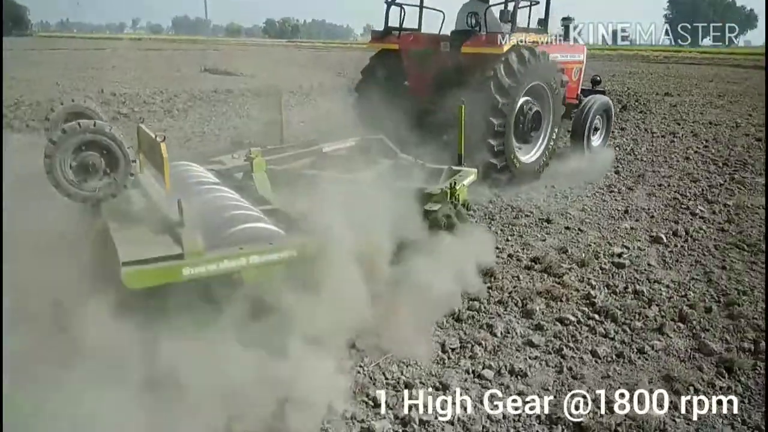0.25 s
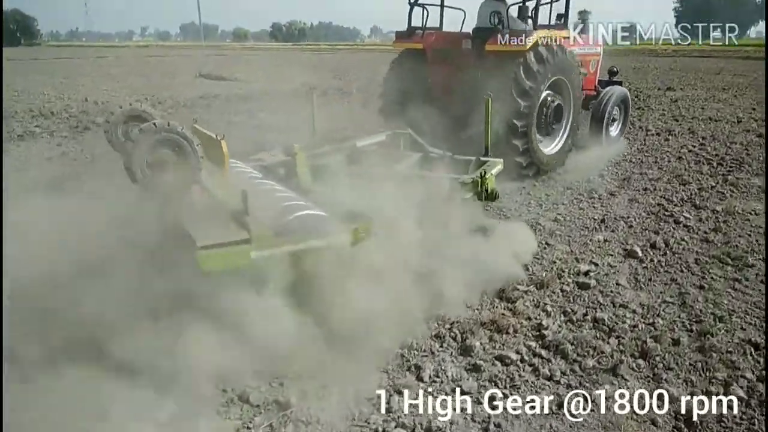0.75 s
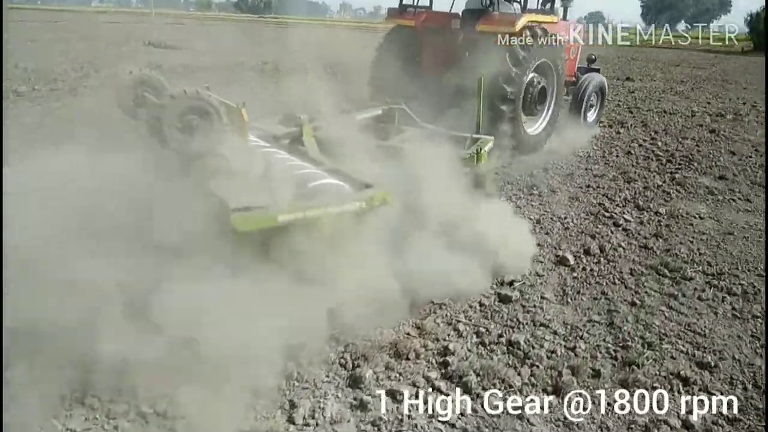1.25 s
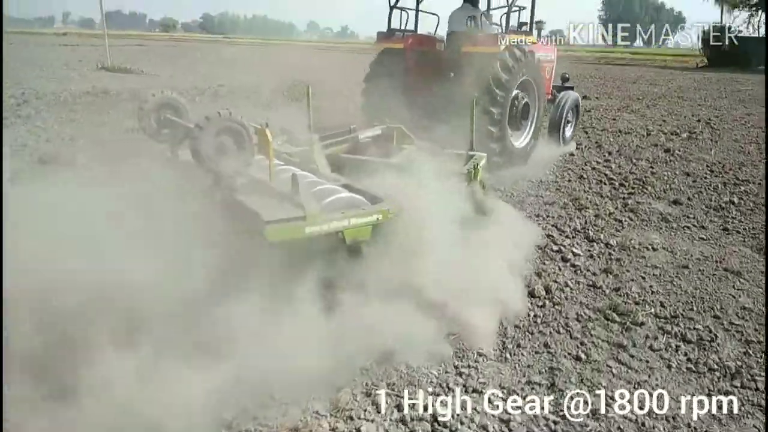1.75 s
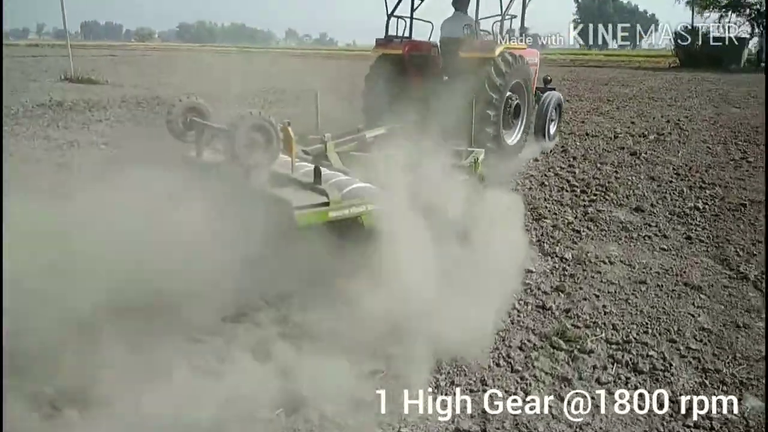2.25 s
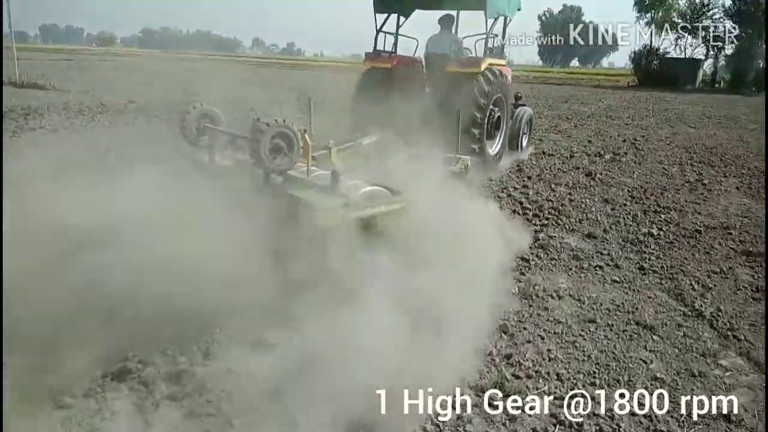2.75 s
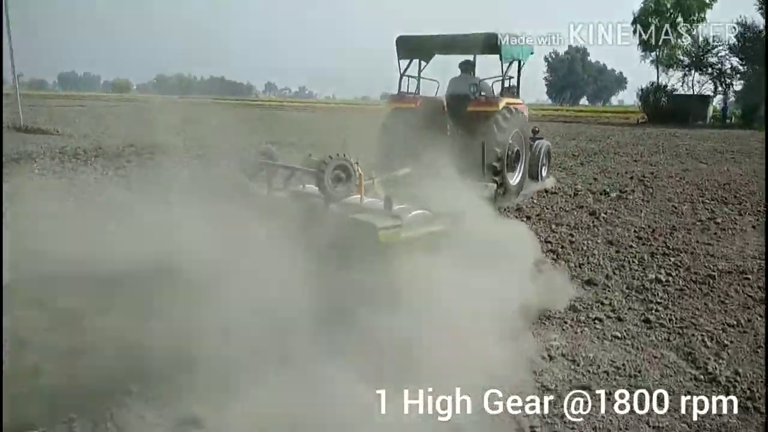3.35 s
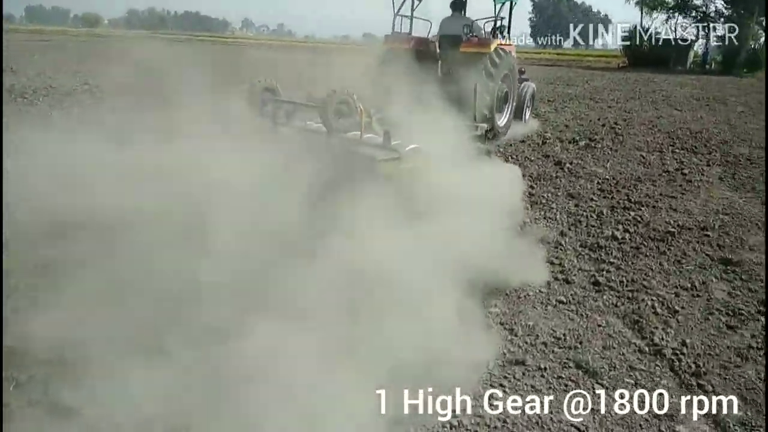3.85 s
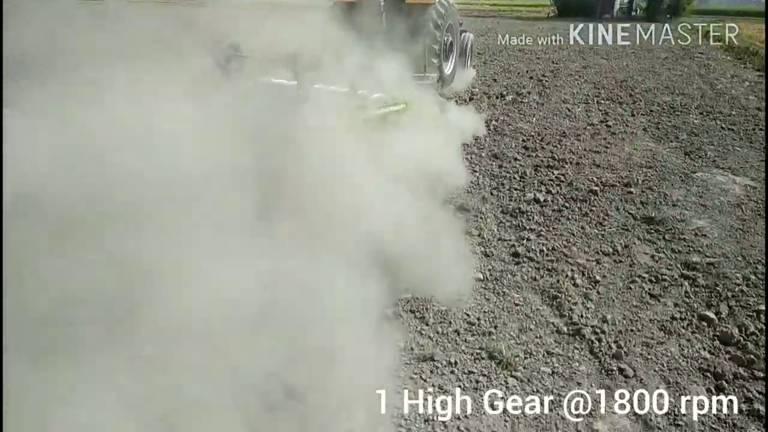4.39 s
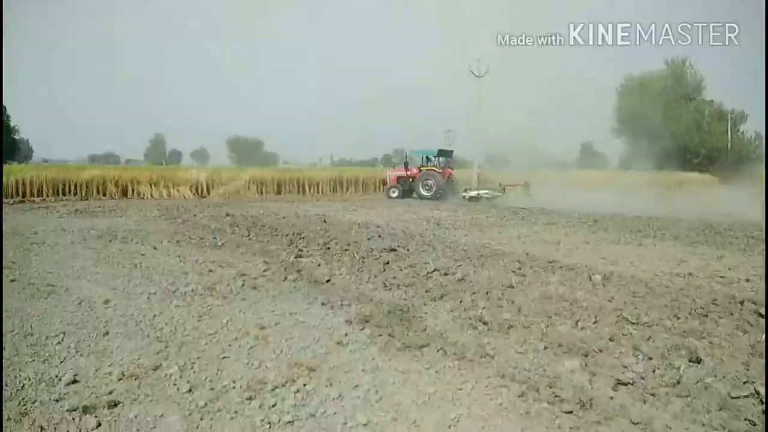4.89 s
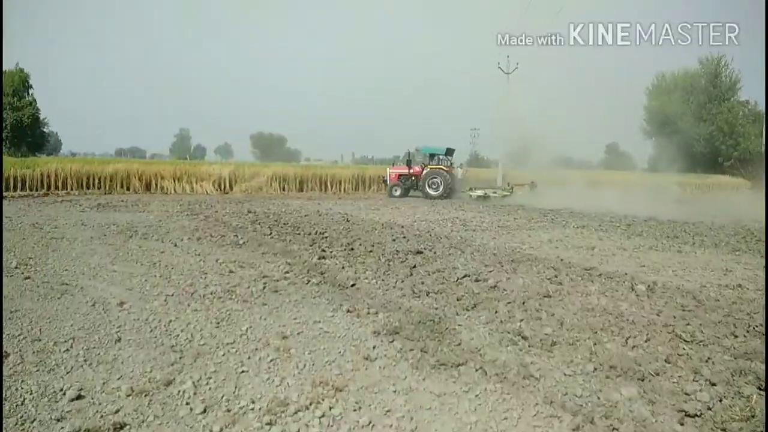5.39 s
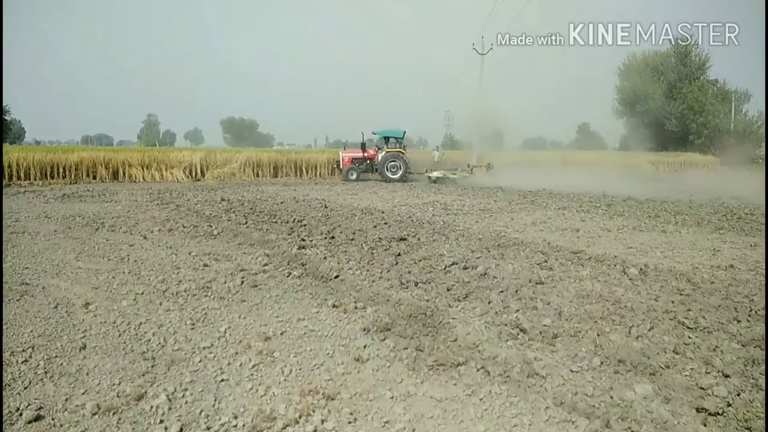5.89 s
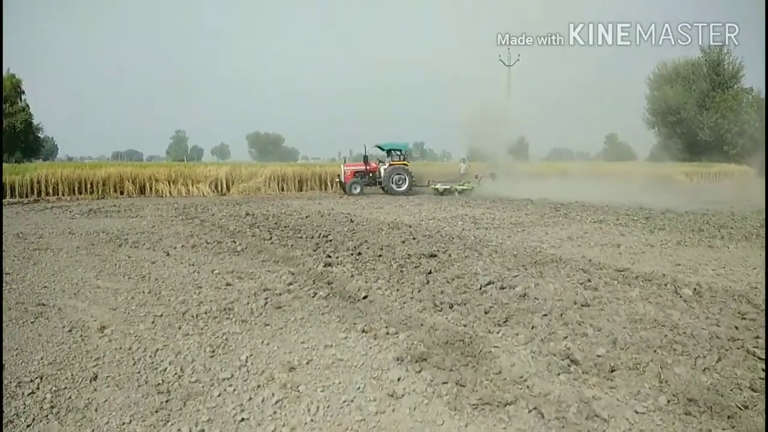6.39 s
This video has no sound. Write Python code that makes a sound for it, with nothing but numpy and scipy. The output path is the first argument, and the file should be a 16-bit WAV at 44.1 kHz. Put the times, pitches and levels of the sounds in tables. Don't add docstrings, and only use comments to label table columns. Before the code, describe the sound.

Outdoors in an open field, a four-cylinder diesel tractor drones under load close to a handheld phone, with engine clatter, wavering gear whine and a harrow rasping and hissing over dry soil. Stones tick sharply on the discs. It slowly recedes, then after a tiny hush the sound jumps to a distant view: thinner drone, slightly faster engine, fainter rasp and ticks.

```python
import sys
import numpy as np
from scipy import signal
from scipy.fft import rfft, irfft, next_fast_len
from scipy.io import wavfile
from scipy.ndimage import uniform_filter1d, map_coordinates

SR = 44100
rng = np.random.default_rng(int(sys.argv[2]) if len(sys.argv) > 2 else 0)


def natural_amplitude(level_db):
    exponent = np.asarray(level_db, float) / 20
    return 10 ** exponent


def wav_record(signal):
    frames = np.transpose(np.atleast_2d(signal))
    bounded = np.clip(frames, -1, 1)
    quanta = np.round(bounded * 32767).astype(np.int16)
    wavfile.write(sys.argv[1], SR, quanta)


N = 292383
T = np.arange(N) / SR
CHANGE_S = 4.746


def unit(x):
    return x / np.sqrt(np.mean(x ** 2) + 1e-20)


def along(points, hz):
    f, v = np.transpose(points)
    return np.interp(np.log(hz + 1), np.log(f + 1), v)


def curves(rows):
    s, *cols = np.transpose(rows)
    return [np.interp(T, s, c) for c in cols]


def swells(rows):
    return sum(db * np.exp(-((T - s) / length) ** 2) for s, length, db in rows)


def wobble(rate):
    knots = rng.standard_normal(N // 200)
    return map_coordinates(knots, [T * rate])


def filtered(x, response):
    m = next_fast_len(N + 8192)
    return irfft(rfft(x, m) * response(np.fft.rfftfreq(m, 1 / SR)), m)[..., :N]


def tone(cycles, flutter_db, drift, rate):
    phase = 2 * np.pi * (cycles + rng.random() + drift * wobble(rate))
    return np.sqrt(2) * natural_amplitude(flutter_db * wobble(rate)) * np.sin(phase)


# [f/Hz, likeness 0-1]
LIKENESS = [
    [(60, 0.41), (130, 0.86), (290, 0.93), (640, 0.98), (1410, 0.73), (2300, 0.31), (2800, .1),
     (15000, 0.081)],
    [(60, 0.75), (130, 0.98), (290, 0.58), (640, 0.99), (1030, .72), (1410, 0.77), (1720, 0.9),
     (2070, 0.94), (2750, .15), (3400, 0.27), (15000, 0.085)],
]


def rush(spectrum, side, patchy_db, streaky_db=0):
    z = signal.stft(rng.standard_normal((2, N)), nperseg=512)[2]
    patch = uniform_filter1d(rng.standard_normal(z.shape[1:]), size=6, axis=0)
    patch = uniform_filter1d(patch, size=10, axis=1)
    streak = uniform_filter1d(rng.standard_normal(z.shape), size=2, axis=1)
    streak = uniform_filter1d(streak, size=8, axis=2)
    gain_db = patchy_db * unit(patch) + streaky_db * unit(streak)
    pair = signal.istft(z * natural_amplitude(gain_db), nperseg=512)[1][:, :N]

    def spread(hz):
        colour = natural_amplitude(along(spectrum, hz)) * np.clip(hz / spectrum[0][0], 0, 1) ** 6
        angle = np.arccos(np.clip(along(LIKENESS[side], hz), 0, 1)) / 2
        return colour * [np.cos(angle), np.sin(angle)]

    mid, diff = filtered(pair, spread)
    return unit(np.array([mid + diff, mid - diff]))


# [start level/dB, loss/dB per s]
STEADY_LAYERS = [
    [(-29, 0.83), (-41.5, 1), (-40, 3), (-40, 3), (-28.5, 0.52)],
    [(-59.5, 0), (-51, 1.5), (-59, 0), (-53, 5.5), (-40, -1)],
]


def steady(side):
    start_db, loss_db = np.transpose(STEADY_LAYERS[side])
    return start_db[:, None] - loss_db[:, None] * (T - side * CHANGE_S)


# [t/s, third order level/dB]
STACK_FACING = [
    [(0.0, -48), (0.09, -24.5), (.35, -23.5), (.65, -29), (1.05, -25), (1.4, -31.5), (1.91, -29.5),
     (2.05, -26), (2.19, -34), (2.45, -33.5), (2.6, -35.5), (3.5, -40), (4.12, -51), (4.21, -47),
     (4.63, -35.5), (4.74, -51)],
    [(4.79, -42), (4.856, -37), (5.25, -45.5), (5.45, -43), (5.55, -46), (5.7, -48), (5.758, -48),
     (5.82, -37), (5.95, -45), (6.086, -41.5), (6.25, -35.5), (6.55, -38), (6.63, -38)],
]
# [multiple of firing, level/dB to the third order]
EXHAUST_ORDERS = [
    [(1.16, -24), (3, 1.5), (3.5, -15), (4, -13), (4.5, -19), (5, -16)],
    [(1.21, -33), (2.5, -27), (3, -1), (3.5, -24), (4, -26), (5, -37)],
]
# [f/Hz, level/dB per Hz]
PIPE_COLOUR = [
    [(76, -51), (130, 0), (226, 4.5), (345, -4), (439, -13), (500, -11.5), (560, -5.5), (650, -8.5),
     (1100, -120)],
    [(150, -32), (200, 5), (240, -10), (300, -11), (380, -10), (460, -5), (520, -24), (700, -120)],
]
# [f/Hz, level/dB per Hz]
GROUND_COLOUR = [
    [(13, -57), (22, -29), (59, -22.5), (99, -18.5), (150, -10.5), (200, -20), (330, -120)],
    [(13, -64), (22, -38), (65, -19), (113, -22), (150, 1), (200, -17), (330, -120)],
]
# [t/s, length/s, rise/dB]
ECHO_THROBS = [
    (.32, 0.097, -14),
    (.6, .1, 5),
    (.95, 0.054, -7),
    (1.12, .06, 4),
    (1.9, .1, -7),
    (3.2, .05, -6),
    (3.4, .06, 1),
    (3.7, 0.087, 9.5),
    (4.15, .12, 7.5),
    (4.6, 0.091, 3),
]
# [t/s, length/s, rise/dB]
RUMBLE_LUMPS = [(4.79, .03, 9), (4.96, 0.054, 8), (5.18, .025, 8), (5.42, .06, 4), (5.6, .05, -2),
                (5.84, .05, 6), (5.95, .04, -10), (6.08, 0.08, 16), (6.26, .03, -6), (6.43, 0.068, 7),
                (6.54, .04, 12)]


def exhaust(side, firings):
    order_db, = curves(STACK_FACING[side])
    rumble_db, ground_db, second_db = steady(side)[:3]
    flutter_db, rate = [(1.4, 11), (2.6, 19)][side]
    orders = sum(natural_amplitude(db) * tone(k * firings, flutter_db, drift=0.065, rate=rate)
                 for k, db in EXHAUST_ORDERS[side])
    second = tone(2 * firings, flutter_db=-1.5, drift=0.18, rate=8.1)
    puff = natural_amplitude(0.46 * np.cos(2 * np.pi * firings) + 0.58 * wobble(4.4))
    rumble = unit(puff * rush(PIPE_COLOUR[side], side, patchy_db=1.5, streaky_db=[0, 4.5][side]))
    ground = rush(GROUND_COLOUR[side], side, patchy_db=2.5)

    sound = natural_amplitude(order_db - 2.5) * orders
    sound = sound + natural_amplitude(second_db + swells(ECHO_THROBS)) * second
    sound = sound + natural_amplitude(rumble_db + side * swells(RUMBLE_LUMPS)) * rumble
    return sound + natural_amplitude(ground_db) * ground


# [clatter depth/dB, rasp and hiss depth/dB]
BEAT_DEPTH = [(.75, .3), (1.2, 1.5)]
# [t/s, engine block level/dB]
NEARNESS = [
    [(0.0, -33), (0.84, -32.5), (3.25, -34.5), (3.45, -33.5), (4.66, -36), (4.71, -34), (4.74, -37)],
    [(4.79, -32), (4.974, -33.5), (6.608, -32.5), (6.63, -31)],
]
# [f/Hz, level/dB per Hz]
BLOCK_COLOUR = [
    [(620, -16), (1050, -8.5), (1190, -13.5), (1370, 0), (1480, 0), (1600, -3.5), (1880, -3), (1970, -4.5),
     (2400, -5), (2640, -16), (3040, -11), (4800, -21.5), (6240, -21.5), (10600, -120)],
    [(620, -38), (1050, -26), (1130, -26), (1250, -9.5), (1370, -8.5), (1680, -12.5), (1880, -6.5),
     (2310, -12.5), (3000, -16), (3600, -15.5), (4800, -17.5), (6240, -25), (10600, -120)],
]
PUMP_HZ = [(1986, 1585, 2370), (1922, 1417, 1860, 2030)]
PUMP_REST = [(-24.5, -40, -35), (-24, -19, -25, -23.5)]
# [t/s, length/s, rise/dB over rest]
PUMP_LABOUR = [
    [[(2.7, 0.49, 12), (3.5, 0.3, 16)], [(2.8, 0.8, 22), (4, 0.86, 25.5)], [(3.5, .25, 18),
     (4.25, 0.45, 18.5)]],
    [[(4.84, 0.11, 16), (5.17, 0.11, 18.5), (5.32, 0.038, 14), (5.52, .05, 17), (5.72, .05, 18.5),
     (6, 0.066, 13)], [(5.63, 0.13, 15), (6.5, 0.14, 9)], [(4.9, 0.13, 15), (5.35, .06, 14),
     (5.57, 0.081, 15), (6.1, .1, 13), (6.5, .12, 15.5)], [(4.95, 0.093, 13), (5.37, .06, 16),
     (5.56, 0.055, 21), (5.75, .05, 9)]],
]


def clatter(side, beat, jolt):
    level_db, = curves(NEARNESS[side])
    shake_db = BEAT_DEPTH[side][0] * beat + .45 * jolt
    block = unit(natural_amplitude(shake_db) * rush(BLOCK_COLOUR[side], side, patchy_db=-0.73, streaky_db=1.0))
    whines = zip(PUMP_HZ[side], PUMP_REST[side], PUMP_LABOUR[side])
    pump = sum(natural_amplitude(db + swells(rows)) * tone(hz * T, flutter_db=2.5, drift=[.3, .22][side], rate=18)
               for hz, db, rows in whines)
    return natural_amplitude(level_db + [3.5, 1.5][side]) * (block + pump)


def knock(firings):
    count = int(firings[-1]) + 1
    cylinders = [1.45, .85, 1.0, .7]
    strength = np.resize(cylinders, count) * natural_amplitude(.8 * rng.standard_normal(count))
    swell = strength[firings.astype(int)] * np.sin(np.pi * (firings % 1)) ** 6
    return unit(swell - swell.mean())


# [t/s, whine level/dB]
GEAR_PULL = [
    [(0.0, -25), (0.7, -25), (0.88, -32.5), (0.94, -22), (1.64, -31), (1.74, -28.5), (2.65, -28.5),
     (2.86, -33), (3.43, -32.5), (3.46, -41), (3.87, -26.5), (4.57, -50.5), (4.63, -21), (4.74, -60)],
    [(4.79, -35), (5.02, -41), (6.542, -48.5), (6.63, -36)],
]
# [t/s, tooth mesh f/Hz]
MESH_PITCH = [
    [(0, 709), (.27, 706), (.36, 710), (.47, 709), (.6, 713), (.76, 704), (.95, 712), (1.14, 704),
     (1.28, 715), (1.44, 703), (1.57, 707), (1.7, 721), (1.87, 692), (2.0, 706), (2.08, 715), (2.23, 699),
     (2.4, 707), (2.58, 702), (2.76, 706), (2.92, 715), (3.03, 707), (3.15, 714), (3.29, 698), (3.45, 712),
     (3.59, 725), (3.72, 710), (3.84, 703), (4.0, 708), (4.09, 715), (4.17, 708), (4.29, 715), (4.5, 708),
     (4.74, 710)],
    [(4.79, 723), (5.0, 727), (5.19, 723), (5.35, 730), (5.63, 734), (5.78, 723), (6.02, 744), (6.33, 727),
     (6.63, 737)],
]
# [multiple of mesh, level/dB to the first pair]
TOOTH_TONES = [
    [(1, -0.5), (2, -9.5), (2.135, -20)],
    [(1, -0.5), (1.22, -12), (1.575, -13), (1.99, -5)],
]
# [first pair level/dB, second pair level/dB to the whine]
PAIR_LEVEL = [(-7, -2), (-3, -6)]
# [t/s, length/s, rise/dB]
FIRST_BITES = [(.6, 0.069, 6), (1.0, 0.16, 2.5), (1.17, 0.044, -4), (1.31, 0.092, 6.5), (1.72, 0.075, 1),
               (2.1, 0.079, 6.5), (2.28, 0.04, 7.5), (2.8, 0.14, 4.5), (3.03, .05, 8.5), (3.3, 0.15, 4.5),
               (4.63, 0.03, -10), (4.9, 0.09, 4), (5.5, 0.05, 8.5), (6.3, 0.097, 9.5)]
# [t/s, length/s, rise/dB]
SECOND_PAIR_BITES = [(.25, 0.17, 2), (.72, 0.09, 5.5), (1.1, 0.11, -1.5), (1.52, 0.045, -4),
                     (1.86, 0.049, 4.5), (2.14, 0.034, 6), (2.45, 0.074, -1), (2.6, 0.052, 4.5),
                     (2.9, 0.12, -6), (3.03, 0.041, 4.5), (3.12, 0.046, -6), (3.4, 0.057, 6.5),
                     (4.08, 0.04, 5.5), (4.2, 0.079, -8), (4.45, .06, 15.5), (4.9, .1, 5), (5.2, 0.12, 5.5),
                     (5.68, 0.076, 7.5), (5.9, 0.051, 14), (6.3, .2, -7)]
# [t/s, length/s, rise/dB]
THIRD_PAIR_BITES = [(.45, .08, 3.5), (.75, .06, -5.5), (.95, 0.07, 4.5), (1.66, 0.12, 8),
                    (1.92, 0.064, 2.5), (2.12, 0.065, 8.5), (2.45, 0.045, 13), (3.1, 1, -5.5),
                    (3.52, 0.035, 15), (4.57, 0.052, 9), (5.97, 0.077, 13)]
# [f/Hz, level/dB per Hz]
HOUSING_COLOUR = [
    [(250, -21), (430, -17.5), (461, -26), (540, -22), (620, -11.5), (705, -4.5), (746, -4), (824, -9),
     (1150, -22), (1500, -14), (2530, -120)],
    [(400, -70), (470, -19.5), (511, -10), (623, -8.5), (734, -2), (956, -10), (1150, -5), (1500, -21),
     (2500, -120)],
]
# [t/s, length/s, rise/dB]
HOUSING_KNOCKS = [
    (3.562, .003, 8.5),
    (3.62, 0.0055, 7),
    (3.64, 0.076, 2.5),
]


def gearbox(side):
    inertia_s, mesh_wander = .04, .0005
    second_ratio, third_ratio = 1.067, .714
    dulls_hz, dulls_db = 665, 2.7

    whine_db, = curves(GEAR_PULL[side])
    third_db, housing_db = steady(side)[3:]
    mesh_hz = uniform_filter1d(curves(MESH_PITCH[side])[0], size=int(inertia_s * SR))
    teeth = np.cumsum(mesh_hz * (1 + mesh_wander * wobble(7.92))) / SR
    first = sum(natural_amplitude(db) * tone(k * teeth, flutter_db=1.6, drift=0.045 * k, rate=16)
                for k, db in TOOTH_TONES[side])
    second = tone(second_ratio * teeth, flutter_db=[1.8, 3][side], drift=[.055, .11][side], rate=15)
    third = tone(third_ratio * teeth, flutter_db=2.5, drift=0.14, rate=20)

    first_db, second_db = PAIR_LEVEL[side]
    pairs = natural_amplitude(first_db + swells(FIRST_BITES)) * first
    pairs = pairs + natural_amplitude(second_db + swells(SECOND_PAIR_BITES)) * second
    whine = natural_amplitude(whine_db) * pairs + natural_amplitude(third_db + swells(THIRD_PAIR_BITES)) * third

    hum = rush(HOUSING_COLOUR[side], side, patchy_db=0.5)
    low_hum = filtered(hum, lambda hz: 1 / (1 + (hz / dulls_hz) ** 16))
    hum = hum - (1 - natural_amplitude(-dulls_db * T * (1 - side))) * low_hum
    return whine + natural_amplitude(housing_db + swells(HOUSING_KNOCKS)) * hum


# [t/s, rasp level/dB]
DISC_BITE = [
    [(0.0, -32), (0.75, -31.5), (1.68, -35), (2.02, -32.5), (2.24, -34), (3.02, -35.5), (3.04, -31.5),
     (3.22, -36), (3.64, -33), (3.71, -37.5), (4.65, -37.5), (4.74, -38)],
    [(4.79, -36), (5.328, -46.5), (5.702, -49.5), (5.716, -42), (6.152, -45.5), (6.63, -42.5)],
]
# [f/Hz, level/dB per Hz]
CLOD_COLOUR = [
    [(2530, -1), (4300, -4), (6870, -3), (8190, 0.5), (9800, -5), (12700, -51), (21600, -120)],
    [(2530, -17), (4300, -25), (4830, -13), (5140, -11.5), (6110, -1), (6680, 1), (9800, -10), (12700, -52),
     (21600, -120)],
]
# [f/Hz, level/dB per Hz]
DUST_COLOUR = [
    [(5470, -23), (9300, -0.5), (10100, 3), (11600, 3.5), (13400, 2), (14900, -2.5), (15500, -5.5),
     (16000, -21)],
    [(5470, -10), (9300, -2.5), (10500, -0.5), (11300, -0.5), (13100, -6), (15000, -7), (15500, -10.5),
     (16000, -23)],
]
# [hiss over rasp/dB, its swing over the rasp's, loss when turned/dB]
HISS_RULE = [(1, 0.34, 3), (1, 0.4, -10)]
# [t/s, length/s, rise/dB]
DUST_PUFFS = [
    (2.03, 0.056, 1.5),
    (2.95, 0.43, 2.5),
    (3.1, .08, 3.5),
    (3.75, 0.23, -2),
    (4.52, .1, 2),
    (5.74, 0.028, 2),
]
# [t/s, turn 0-1]
PHONE_TURN = [
    [(0, 0), (1.7, .05), (2.9, .15), (3.2, .45), (3.4, 1), (4.3, 1), (4.5, .5), (4.75, .4)],
    [(4.78, 0), (5.1, .85), (5.4, 1), (6.63, 1)],
]


def harrow(side, beat, jolt):
    rasp_db, = curves(DISC_BITE[side])
    turn, = curves(PHONE_TURN[side])
    over_db, swing, turned_db = HISS_RULE[side]
    mean_db = np.mean(DISC_BITE[side], axis=0)[1]
    hiss_db = mean_db + over_db + swing * (rasp_db - mean_db)
    hiss_db = hiss_db - turned_db * turn + swells(DUST_PUFFS)
    swell = natural_amplitude(BEAT_DEPTH[side][1] * beat + 0.7 * jolt)
    rasp = unit(swell * rush(CLOD_COLOUR[side], side, patchy_db=-0.7, streaky_db=1.5))
    hiss = unit(swell * rush(DUST_COLOUR[side], side, patchy_db=1.0, streaky_db=3))
    return natural_amplitude([3, -1.5][side]) * (natural_amplitude(rasp_db) * rasp + natural_amplitude(hiss_db) * hiss)


# [t/s, peak level/dB]
STONE_HITS = [
    [(0.1411, -17), (0.4344, -18), (0.5038, -17.5), (0.5606, -24), (0.6519, -23), (0.6759, -11.5),
     (0.7033, -18), (0.7472, -15), (1.0595, -21), (1.2426, -13), (1.8367, -17), (1.8657, -15.5),
     (2.355, -22), (2.6434, -19), (2.6818, -18), (2.7696, -20), (2.8604, -18), (2.8873, -13), (3.3283, -18),
     (3.5927, -17), (3.6651, -23), (3.7788, -19), (3.9374, -23), (3.9823, -26), (4.0238, -15),
     (4.1245, -19)],
    [(5.0768, -29), (5.1427, -25), (5.2614, -22), (5.4036, -21), (5.4754, -25), (5.5018, -20),
     (5.5467, -19.5), (5.6505, -27.5), (5.8131, -17), (5.8486, -22.5), (5.9219, -20), (5.9748, -17),
     (6.0775, -20.5), (6.2906, -24), (6.3285, -25), (6.4692, -22), (6.5235, -18), (6.5934, -21)],
]


def stones(side):
    t60_s, trim_db = 0.018, -3.5
    length = SR // 20
    fall = np.zeros(N + length)
    for s, db in STONE_HITS[side]:
        fall[round(s * SR):][:length] += natural_amplitude(db + trim_db - 60 * T[:length] / t60_s)
    return fall[:N] * rush(BLOCK_COLOUR[side], side, patchy_db=0)


# [t/s, firing f/Hz]
FIRING_RATE = [
    [(0.0, 54.1), (1.6, 54.5), (2.0, 54.2), (3.0, 54.6), (4.74, 54.6)],
    [(4.79, 55.4), (5.0, 56.1), (6.62, 56.3)],
]
# [f/Hz, left minus right level/dB]
PORT_BALANCE = [
    [(60, 1), (100, -0.5), (180, 2), (310, 0.5), (550, 3), (950, -1), (1650, -2.5), (2860, -3.5),
     (4970, 0.5), (8640, -5), (15000, 9)],
    [(60, 8), (100, -2), (180, 1.5), (310, -7), (550, -1.5), (950, 2), (1650, -5.5), (2860, -7), (4970, 1),
     (8640, -3), (15000, 2.5)],
]
PORT_LAG = [3.5e-5, 6.5e-5]


def tractor(side):
    firings = np.cumsum(curves(FIRING_RATE[side])[0] * (1 + 0.0033 * wobble(6))) / SR
    beat = knock(firings)
    jolt = unit(wobble(4) + 1.3 * wobble(9) + wobble(19) + .8 * wobble(37))
    sound = exhaust(side, firings) + clatter(side, beat, jolt) + gearbox(side)
    sound = sound + harrow(side, beat, jolt) + stones(side)
    half = np.array([[.5], [-.5]])

    def ports(hz):
        lag = PORT_LAG[side] * hz ** 3 / (hz ** 2 + 1300 ** 2)
        return natural_amplitude(along(PORT_BALANCE[side], hz) * half) * np.exp(-2j * np.pi * lag * half)

    return filtered(sound, ports)


# [f/Hz facing, f/Hz turned, depth/dB facing, depth/dB turned]
BODY_SHADE = [
    [[(13200, 14800, 8, 1), (8550, 16000, 3, 8), (4870, 7400, 0.5, 5), (2570, 3300, 2, 8),
     (5750, 6800, -2, -1), (14800, 16000, 1.5, 0), (11400, 6300, -2, -3.5), (3510, 3900, -1.5, -2.5),
     (2300, 2360, 3.5, -6.5)], [(13300, 13300, -8, 4), (6460, 6700, 21, 2.5), (8250, 9400, -2, -10),
     (2550, 4800, 19, 21), (7500, 6580, 5, -8), (15200, 15200, -4, 2), (11100, 8800, -9, -2.5),
     (5270, 5500, 3, 4.5), (2020, 670, -8, -7.5)]],
    [[(13300, 13200, -2.5, 5.5), (14500, 14600, -5.5, 19), (10000, 9250, 5, 1.5), (5170, 5000, 1, 7.5),
     (3680, 3600, -0.5, 3.5), (8080, 7040, 3.5, -3)], [(13400, 13500, 2, 4), (15200, 15100, 16.5, 12),
     (8500, 13000, -4, 1), (6070, 5800, 8.5, 0), (4000, 4600, -4, 1.5), (12400, 12500, -11, 5)]],
]
# [t/s, f/Hz, depth/dB]
SOIL_ECHO = [
    [(0, 6350, 2), (.5, 6700, 2.5), (1.9, 6600, 1), (2.15, 5720, 3), (3.1, 5900, 2), (3.35, 4530, 2),
     (4, 4900, 2), (4.4, 5900, 2), (4.74, 5700, 4)],
    [(4.78, 6400, 4), (5.08, 6500, 8), (5.13, 6900, 1), (5.2, 7200, 8), (5.4, 7200, 8), (5.5, 7000, 3),
     (5.8, 6550, 5), (6.1, 6750, 3), (6.63, 6740, 4)],
]


def shaded(x, notches):
    hz, t, z = signal.stft(x, SR, nperseg=512)

    def cut(centre_hz, depth_db, width):
        return natural_amplitude(-depth_db * np.exp(-((hz[:, None] / centre_hz - 1) / width) ** 2))

    turn = np.interp(t, *np.transpose(PHONE_TURN[0] + PHONE_TURN[1]))
    for near, far in zip(*notches):
        now = np.where(t < CHANGE_S, np.reshape(near, (4, 1)), np.reshape(far, (4, 1)))
        facing_hz, turned_hz, facing_db, turned_db = now
        centre_hz = facing_hz + turn * (turned_hz - facing_hz)
        depth_db = facing_db + turn * (turned_db - facing_db)
        z = z * cut(centre_hz, depth_db, width=0.045)
    s, dip_hz, dip_db = np.transpose(SOIL_ECHO[0] + SOIL_ECHO[1])
    z = z * cut(np.interp(t, s, dip_hz), np.interp(t, s, dip_db), width=0.049)
    return signal.istft(z, SR, nperseg=512)[1][:N]


# [f/Hz, level/dB]
HIDING = [(2200, -30), (2700, -6.5), (3600, -5.5), (4400, -2.7), (5500, -2), (6600, -1.8), (8000, -2.8),
          (9800, -2), (11000, -4), (13000, -2.3), (14300, -2), (15200, -.5), (15700, 1.5)]


def starved(ports):
    frame, band = 2048, 8
    lead = frame // 2 - 287
    window = np.sin(np.pi * (np.arange(frame) + .5) / frame)
    hz, t, z = signal.stft(np.pad(ports, ((0, 0), (lead, 0))), SR, window, frame)
    power = np.add.reduceat(np.abs(z) ** 2, np.arange(0, len(hz), band), axis=1)
    power = uniform_filter1d(power, size=2, axis=2)
    around = uniform_filter1d(uniform_filter1d(power, size=23, axis=1), size=3, axis=2)
    around = .6 * around + .4 * around[::-1]
    luck_db = 2.1 * unit(uniform_filter1d(rng.standard_normal(power.shape[1:]), size=2, axis=1))
    hidden = power < around * natural_amplitude(along(HIDING, hz[::band])[:, None] + luck_db) ** 2
    hidden &= np.abs(t - lead / SR - CHANGE_S - .012) > .06
    kept = np.repeat(np.where(hidden, natural_amplitude(-40), 1), band, axis=1)[:, :len(hz)]
    return signal.istft(z * kept, SR, window, frame)[1][:, lead:][:, :N]


def scene():
    stop_db = np.interp(T, [4.7458, 4.748, 4.762, 4.775], [1.0, -74, -70, -80])
    start_db = np.interp(T, [4.75, 4.768, 4.7715, 4.78], [-78, -50, -16, 0])
    return natural_amplitude(stop_db) * tractor(0) + natural_amplitude(start_db) * (T > CHANGE_S) * tractor(1)


def roll_off(x):
    return signal.sosfilt(signal.butter(12, 15720, fs=SR, output="sos"), x)


def record(dry):
    ports = np.array([shaded(x, notches) for x, notches in zip(dry, BODY_SHADE)])
    mix = filtered(starved(ports), lambda hz: hz ** 2 / (hz ** 2 + 16.0 ** 2) * (hz < 15715))
    return roll_off(mix)


dry = scene()
out = record(dry)
wav_record(out)
```